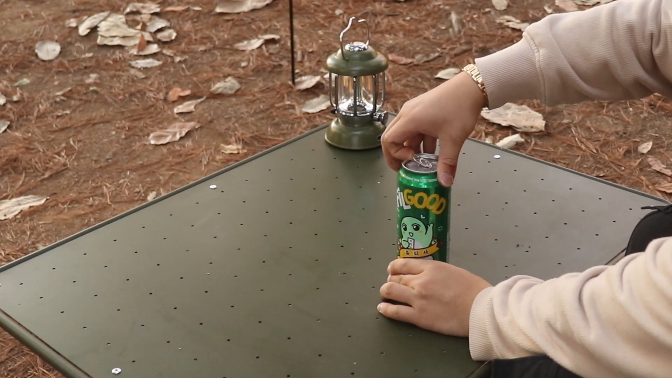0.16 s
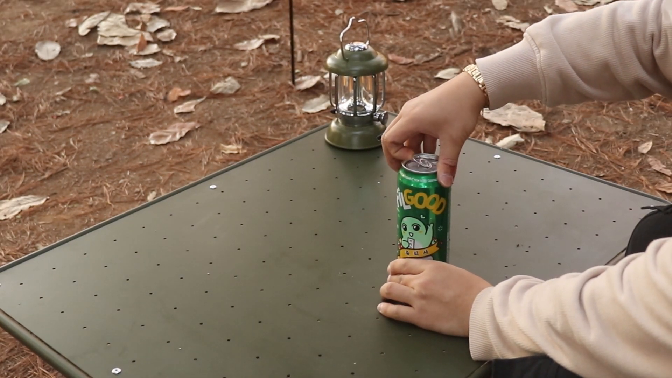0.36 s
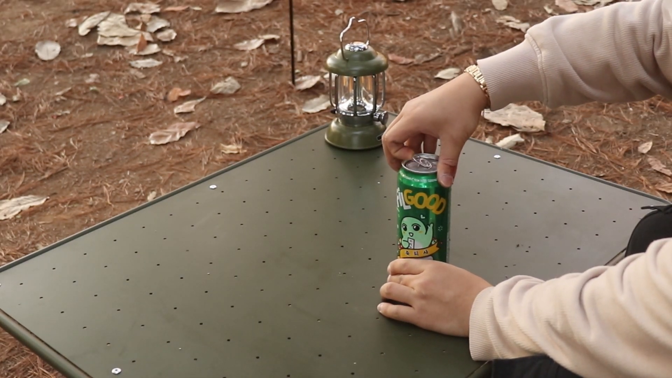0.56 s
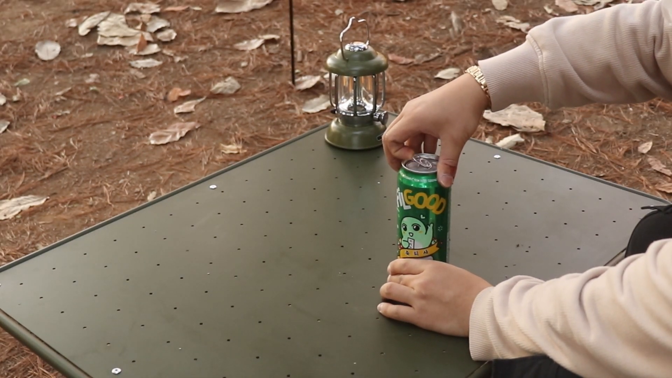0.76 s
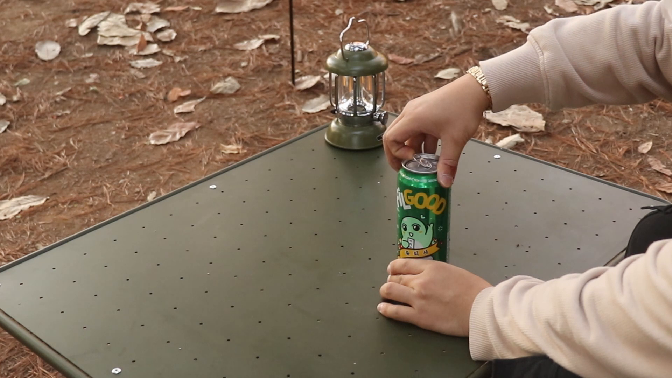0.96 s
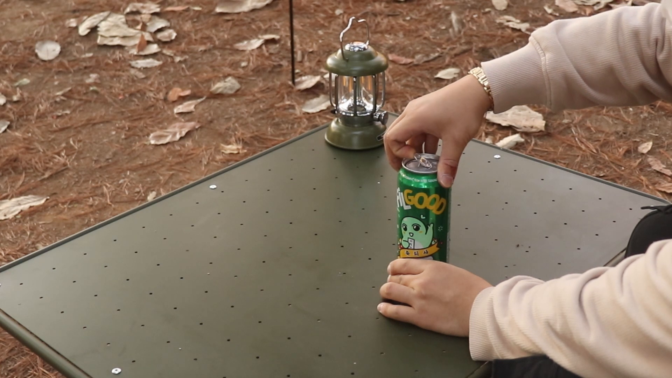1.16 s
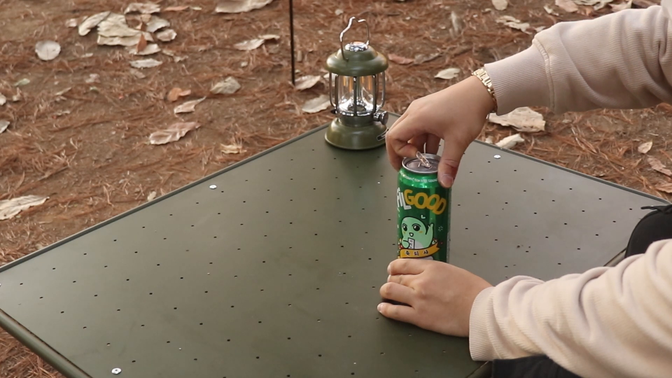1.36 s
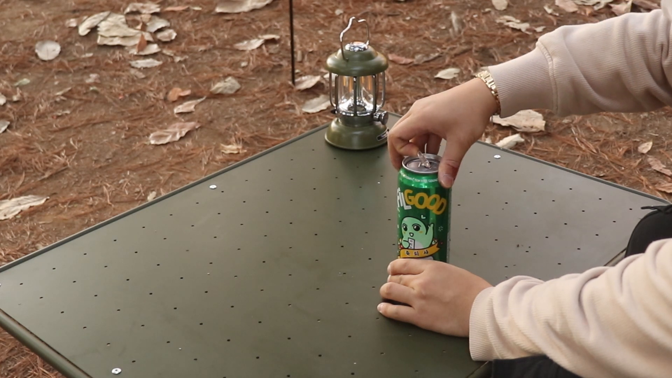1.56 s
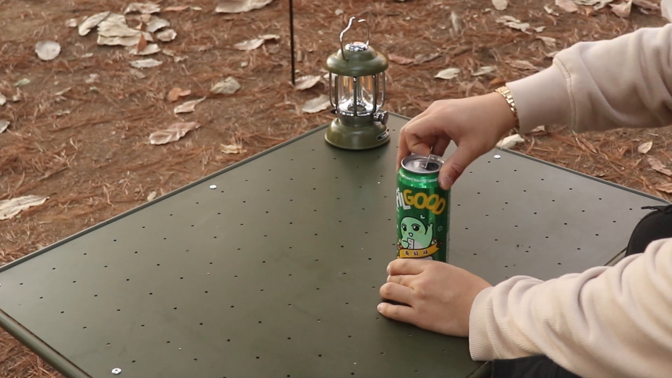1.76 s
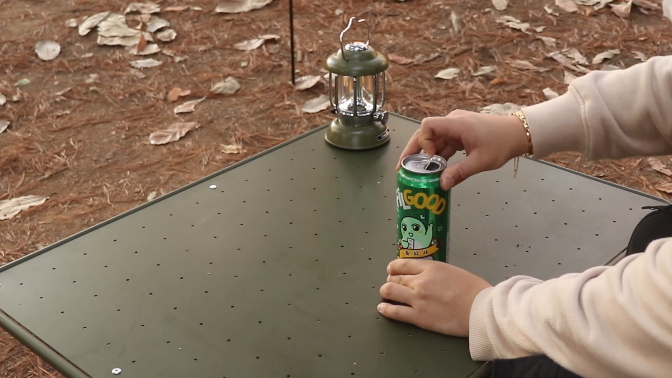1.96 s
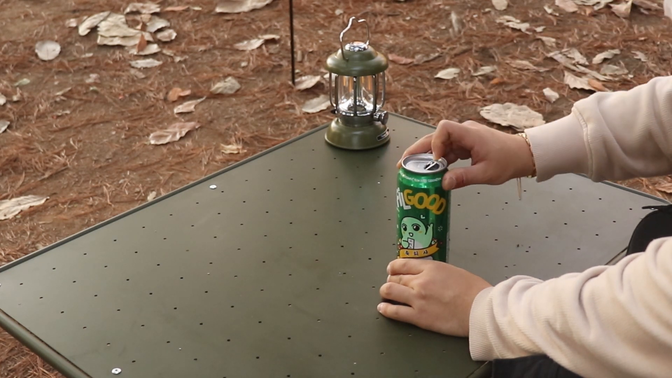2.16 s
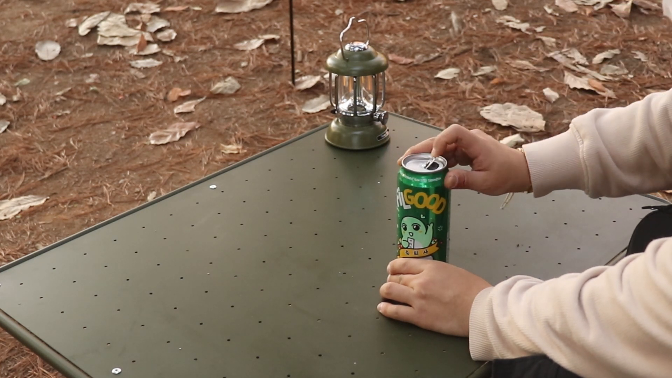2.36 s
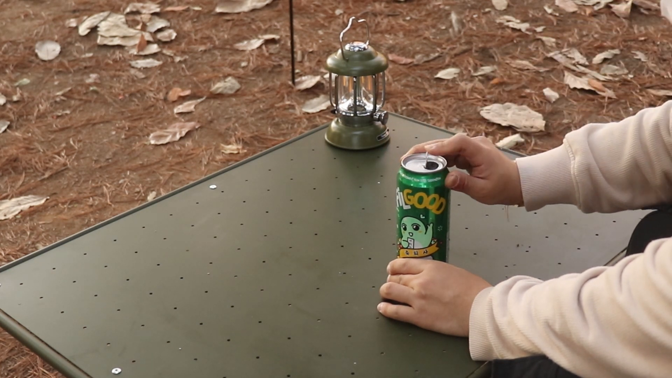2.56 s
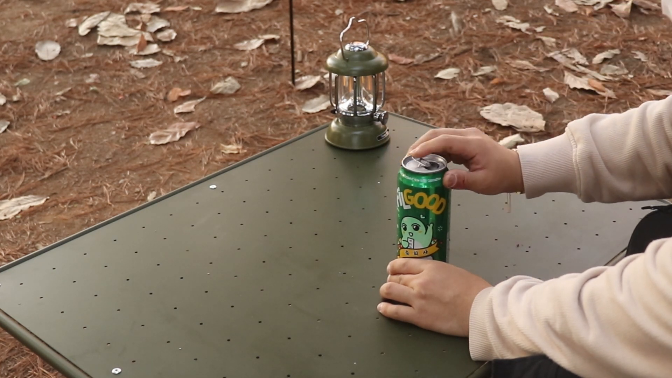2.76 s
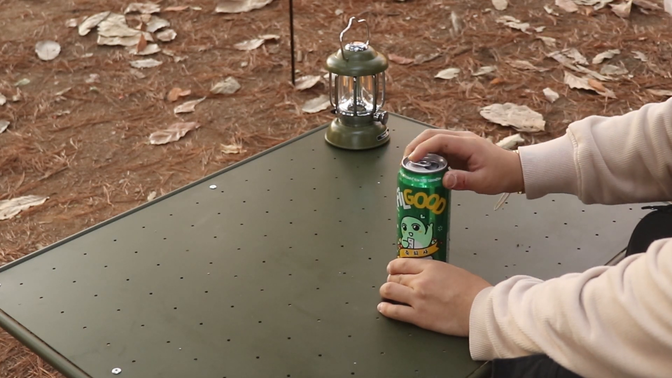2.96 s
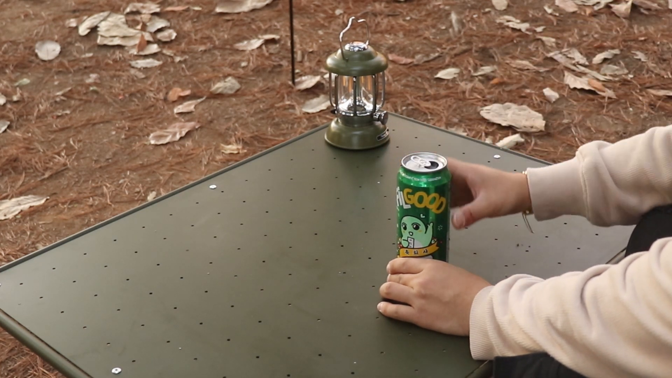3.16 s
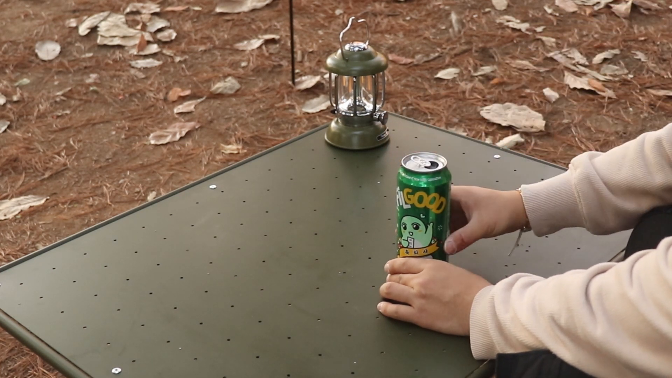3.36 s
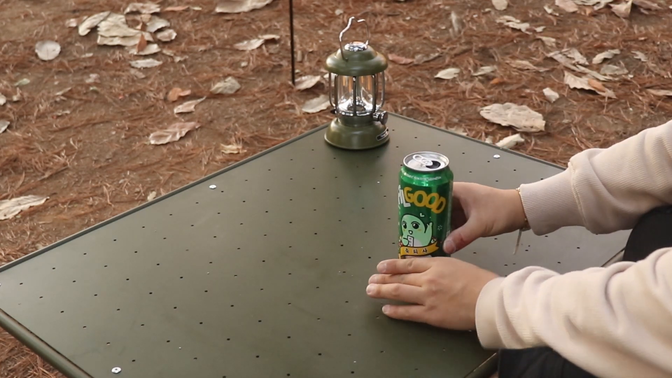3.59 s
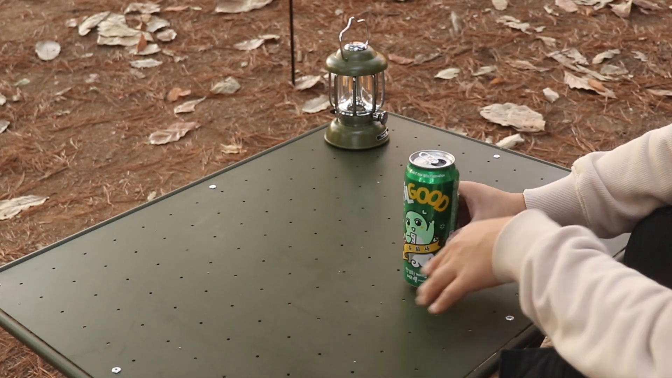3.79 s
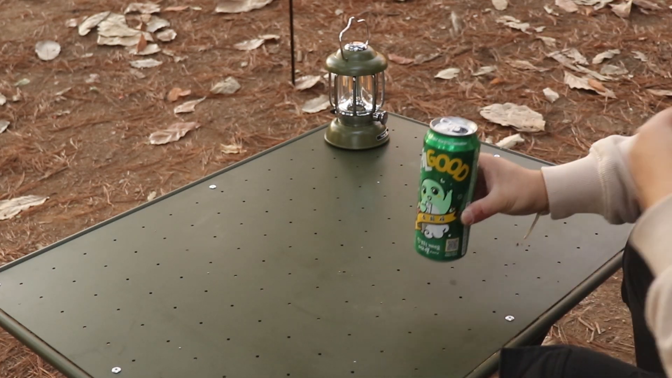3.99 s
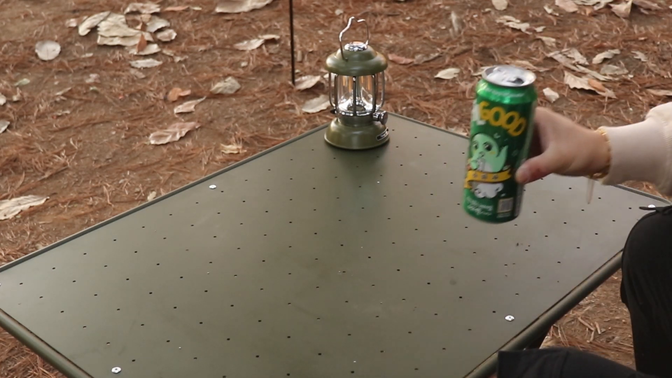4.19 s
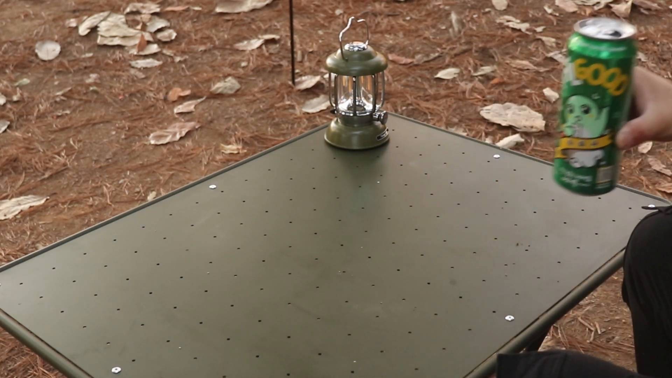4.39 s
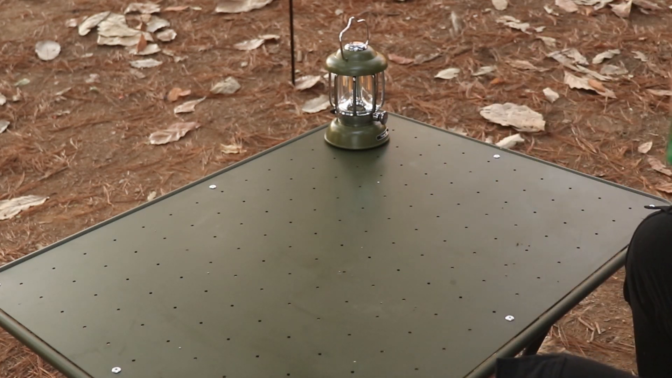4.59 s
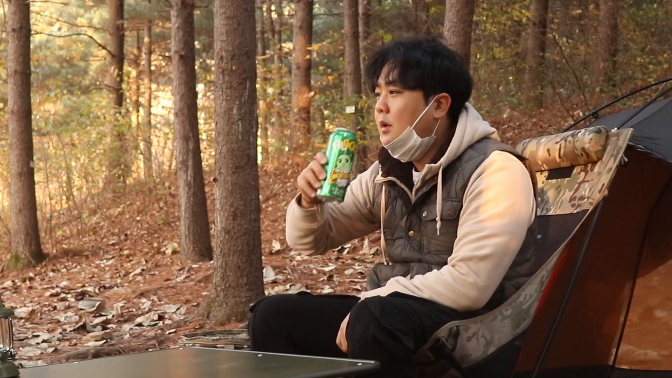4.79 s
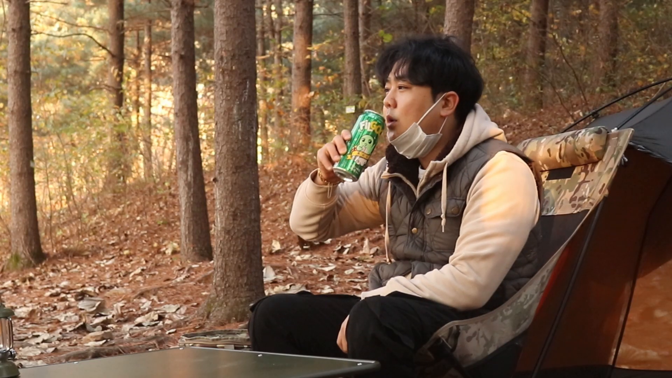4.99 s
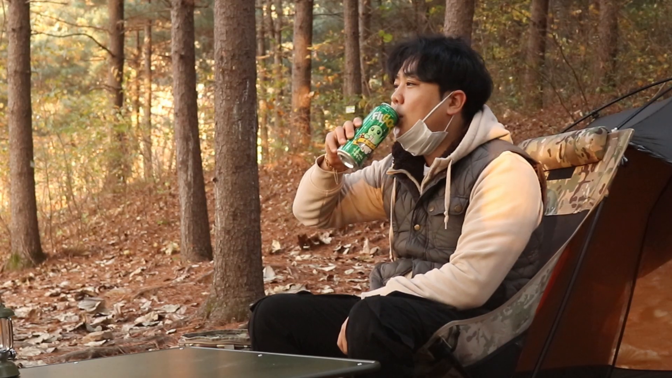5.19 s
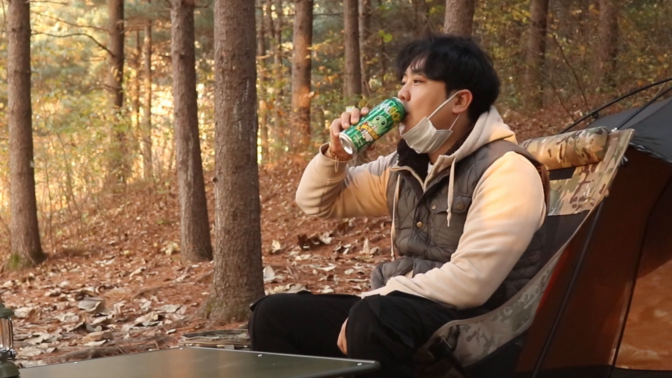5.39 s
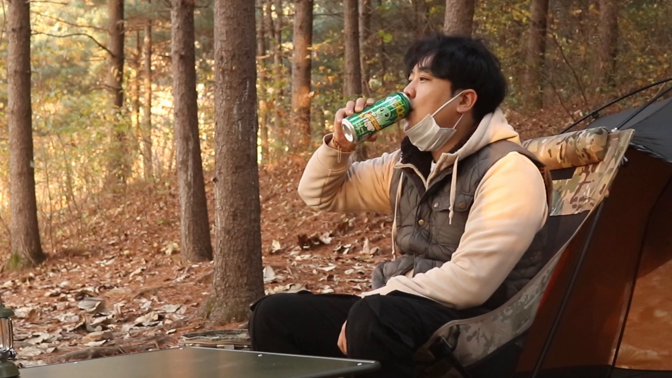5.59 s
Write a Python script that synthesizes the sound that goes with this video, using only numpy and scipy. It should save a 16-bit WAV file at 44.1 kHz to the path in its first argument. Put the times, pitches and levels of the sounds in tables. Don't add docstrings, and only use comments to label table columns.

```python
import sys
import numpy as np
from scipy import signal
from scipy.fft import rfft, irfft
from scipy.io import wavfile

SR = 44100
rng = np.random.default_rng(int(sys.argv[2]) if len(sys.argv) > 2 else 0)


def store_pcm(level_fs):
    pcm = np.round(np.clip(level_fs, -1, 1) * 32767).astype(np.int16)
    wavfile.write(sys.argv[1], SR, np.atleast_2d(pcm).T)


def volts_from_decibels(level):
    exponent = np.asarray(level, float) / 20
    return 10 ** exponent


N = 248724
VIEW_CHANGE_S = 4.664


def rms_one(x):
    return x / np.sqrt(np.mean(x ** 2) + 1e-20)


def peak_one(x):
    return x / np.max(np.abs(x))


def in_time(rows):
    s, *columns = np.transpose(rows)
    t = np.arange(N) / SR
    gate = np.clip(np.minimum(t - s[0], s[-1] - t) / 0.00044, 0, 1)
    return [np.interp(t, s, column) for column in columns] + [gate]


def at_hz(points, hz):
    table_hz, values = np.array(points)[:, 0], np.array(points)[:, 1]
    return np.interp(np.log(hz), np.log(table_hz), values)


def drift(rate):
    r = np.exp(-80 * np.pi * rate / SR)
    white = rng.standard_normal(N // 40 + 2002)
    slow = signal.lfilter([1], [1, -2 * r, r * r], white)[2000:]
    return np.interp(np.arange(N) / 40, np.arange(len(slow)), rms_one(slow))


def ring(force, hz, t60):
    r = volts_from_decibels(-60 / (t60 * SR))
    w = 2 * np.pi * hz / SR
    return signal.lfilter([0, np.sin(w)], [1, -2 * r * np.cos(w), r * r], force)


def coloured(white, spectrum):
    hz = np.maximum(np.fft.rfftfreq(len(white), 1 / SR), 1)
    inside = (hz > spectrum[0][0] / 2) & (hz < 15800)
    return rms_one(irfft(rfft(white) * volts_from_decibels(at_hz(spectrum, hz)) * inside, len(white)))


def lumpy(spectrum, patchy_db, rate):
    return coloured(rng.standard_normal(N), spectrum) * volts_from_decibels(patchy_db * drift(rate))


# start_s, level_db
GUSTS = [(0.0, -28), (0.05, -37), (0.41, -32.5), (1.08, -37.5), (1.19, -41), (1.66, -33.5), (1.78, -45),
         (1.83, -34.5), (2.18, -43), (2.22, -33.5), (2.4, -50), (2.45, -35.5), (2.53, -43.5), (2.74, -34.5),
         (2.98, -44), (3.09, -37.5), (4.35, -37), (4.66, -37)]
# pitch_hz, level_db (per Hz)
WIND_TONE = [(8.8, -26.5), (15, 6), (32, 1.5), (51, -2), (98, -8.5), (146, -18.5), (170, -26.5), (220, -44),
             (370, -120)]
# pitch_hz, level_db (per Hz)
ROAD_TONE = [(88, -38), (150, -10), (175, -4.5), (231, -7), (275, -9), (406, -6), (649, -5), (821, -6.5),
             (888, -7.5), (1260, -17), (2980, -28), (4670, -23), (16000, -48)]
# pitch_hz, level_db (per Hz)
SHELTER_TONE = [(12, -46.5), (20, -13.5), (91, -7), (134, -6.5), (168, -10), (210, -5), (328, -12.5),
                (357, -10.5), (527, -11.5), (780, -8), (1810, -31), (8180, -39.5), (14700, -41.5),
                (16000, -39.5)]


def air():
    wind_db, _ = in_time(GUSTS)
    steep = WIND_TONE + [(260, -56.5)]
    wind = volts_from_decibels(wind_db) * lumpy(steep, patchy_db=-1.5, rate=6.3)
    road = volts_from_decibels(-44.5) * lumpy(ROAD_TONE, patchy_db=-0.82, rate=3)
    shelter = volts_from_decibels(-45.5) * lumpy(SHELTER_TONE, patchy_db=.3, rate=3)
    changed = np.clip((np.arange(N) / SR - VIEW_CHANGE_S) / 0.0024, 0, 1)
    return (wind + road) * (1 - changed) + shelter * changed


# pitch_hz, level_db (per Hz)
DULL_TONE = [(900, 12.5), (1400, 8.5), (2200, 4.5), (3300, 7), (4500, 1), (7000, -5.5), (10000, -30.5)]
# pitch_hz, level_db (per Hz)
CRISP_TONE = [(3500, -24), (5500, -5.5), (8000, 10.5), (10000, 3), (14000, 5.5), (16000, -6)]
# centre_s, spread_s, dull_db, crisp_db
SLEEVE_MOVES = [(.42, 0.096, -53.5, -84), (.69, 0.053, -50, -81), (1.0, .05, -55.5, -65),
                (1.9, 0.058, -65.5, -85), (2.1, .06, -64.5, -69), (3.24, .06, -58.5, -62),
                (3.49, 0.033, -56, -72.5), (3.65, 0.061, -55, -53), (3.9, 0.11, -49.5, -58),
                (4.05, 0.073, -58.5, -64.5), (4.37, 0.066, -54.5, -61), (4.54, 0.12, -55, -62.5)]


def rustle():
    dull = lumpy(DULL_TONE, patchy_db=1.7, rate=53)
    crisp = lumpy(CRISP_TONE, patchy_db=1.6, rate=30)
    t = np.arange(N) / SR
    dull_power, crisp_power = volts_from_decibels(2 * -64), volts_from_decibels(2 * -72)
    for s, spread, dull_db, crisp_db in SLEEVE_MOVES:
        swell = np.exp(-((t - s) / spread) ** 2)
        dull_power = dull_power + volts_from_decibels(2 * dull_db + 5.5) * swell
        crisp_power = crisp_power + volts_from_decibels(2 * crisp_db) * swell
    return (t < VIEW_CHANGE_S) * (np.sqrt(dull_power) * dull + np.sqrt(crisp_power) * crisp)


# start_s, rise_s, from_hz, top_hz, level_db
BIRD_SLURS = [(.015, 0.067, 3400, 4950, -51), (0.476, 0.093, 3250, 4550, -55),
              (0.967, 0.06, 3200, 5530, -50.5), (1.21, 0.097, 3400, 4900, -56.5),
              (1.415, 0.065, 3400, 5460, -54.5), (1.975, .062, 3900, 4850, -57),
              (2.205, 0.065, 3500, 4840, -51.5), (2.545, 0.061, 3300, 4590, -47.5),
              (2.771, .066, 3650, 4900, -55), (2.96, 0.05, 3550, 4720, -48),
              (3.115, 0.034, 3750, 4500, -53.5), (3.45, 0.054, 3700, 4700, -49.5)]
# start_s, length_s, from_hz, to_hz, level_db
QUICK_CHIPS = [(2.196, .012, 3500, 5200, -57), (2.225, .017, 4700, 5350, -57),
               (2.275, .015, 4470, 4260, -51.5), (2.279, 0.016, 3750, 3670, -54),
               (2.44, .011, 3600, 5000, -55), (2.459, 0.025, 3600, 5280, -53.5),
               (2.518, .012, 5210, 3280, -53), (2.53, .018, 3300, 4950, -66),
               (3.019, 0.0202, 4580, 4000, -49), (3.508, .014, 4630, 4120, -54),
               (3.646, 0.017, 5100, 4210, -49.5), (3.66, .016, 5500, 3600, -51),
               (3.672, 0.02, 4630, 4150, -51), (3.694, .025, 4500, 4630, -55),
               (4.062, .23, 13630, 13350, -71.5), (4.322, 0.085, 13350, 13200, -78.5),
               (5.465, .03, 6500, 6450, -72.5), (5.61, .028, 5140, 5100, -73.5)]


def birds():
    notes = []
    for s, length, from_hz, to_hz, db in QUICK_CHIPS:
        middle = (s + length / 2, (from_hz + to_hz) / 2, db)
        notes.append([(s, from_hz, db - 4), middle, (s + length, to_hz, db - 4)])
    loudest_at, bend = .55, 0.049
    for s, rise, from_hz, top_hz, db in BIRD_SLURS:
        loudest_hz = from_hz + (loudest_at + bend) * (top_hz - from_hz)
        notes.append([(s, from_hz, db - 11), (s + loudest_at * rise, loudest_hz, db),
                      (s + rise, top_hz, db - 5), (s + rise + .021, .76 * top_hz, db - 10)])
    out = np.zeros(N)
    for note in notes:
        hz, level_db, gate = in_time(note)
        out += gate * volts_from_decibels(level_db + 5.5) * np.sin(2 * np.pi * np.cumsum(hz) / SR)
    return out * volts_from_decibels(3.0 * drift(90))


# pitch_hz, level_db (per Hz)
ECHO_TONE = [(300, -30), (1000, -12), (1900, -4), (2800, -4), (4200, 0), (6000, -7.5), (9000, -18),
             (15000, -19)]
# pitch_hz, t60_s
ECHO_T60 = [(500, .3), (2000, .36), (4000, .44), (7000, .34), (10000, .25), (15000, .18)]


def wood(x):
    t = np.arange(SR * 3 // 4) / SR
    edges = 250 * 2 ** np.arange(0, 6.1, .5)
    tail = 0
    for low, high in zip(edges, edges[1:]):
        half_octave = signal.butter(2, [low, high], "band", fs=SR, output="sos")
        band = signal.sosfilt(half_octave, rng.standard_normal(len(t)))
        hz = np.sqrt(low * high)
        tail = tail + band * volts_from_decibels(at_hz(ECHO_TONE, hz) - 60 * t / at_hz(ECHO_T60, hz))
    tail = tail * np.minimum(t / 0.012, 1)
    return signal.fftconvolve(x, tail / np.sqrt(np.sum(tail ** 2)))[:N]


# start_s, level_db, brightness_db
GAS_FLOW = [
    (0.143, -18.5, -5.5),
    (0.172, -15, 5),
    (0.234, -20, -2),
    (0.24, -27, -1),
    (0.262, -40, -10.5),
]
# pitch_hz, level_db (per Hz)
GAS_TONE = [(350, -24.5), (600, -19), (944, -20), (1330, -15.5), (1470, -19), (4160, -6.5), (5790, -14),
            (6460, -7.5), (8990, -5), (13000, -3.5), (16000, -3)]


def gas():
    level_db, bright_db, gate = in_time(GAS_FLOW)
    jet = lumpy(GAS_TONE, patchy_db=.8, rate=200)
    low = signal.sosfilt(signal.butter(2, 6000, fs=SR, output="sos"), jet)
    hum = rms_one(ring(jet, 6450, .010) + ring(jet, 8300, .010) + .4 * ring(jet, 4600, .004))
    return gate * volts_from_decibels(level_db) * (jet - low + volts_from_decibels(-bright_db) * (low + volts_from_decibels(-10) * hum))


# pitch_hz, t60_s
LID_RING = [(1500, .004), (2000, .005), (3300, .008), (4050, .016), (4800, .005), (6500, .006),
            (8300, .008), (11500, .008), (14400, .004)]
# start_s, crack_db, contact_ms, ring_hz (of the spot), ring_db (against the crack)
RIVET_SLIPS = [(1.2815, -37, 1.4, 4700, -2.5), (1.2851, -16.5, 1.8, 2090, -3.5), (1.2942, -8.5, 1, 4800, 7),
               (1.3162, -25.5, 4.5, 6470, 7), (1.5472, -30.5, .36, 4000, -8), (1.5636, -13, 1.4, 3820, -4),
               (1.5700, -28.5, 1.9, 2100, -4), (1.5884, -10, .5, 3370, -6), (1.6031, -7.5, .21, 3300, -6.5),
               (1.6633, -5.5, .56, 3140, -9.5), (1.7027, 1, 2.3, 7390, 6), (1.7330, -26.5, .54, 3510, 12),
               (3.5480, -51.5, .36, 6500, -3)]
TAB_SLIPS = [
    (1.3221, -12, .44, 6560, -5.5),
    (1.3268, -4.5, .56, 6575, -6),
    (1.5493, 3.5, .53, 4810, -9.5),
    (4.3830, -43.5, 1.0, 4700, -3),
]
LEVER_SLIPS = [
    (1.5518, -3, 1, 4010, 0),
    (1.7238, -9.5, .4, 2865, -8.5),
    (1.8730, -31, .5, 7660, -7.5),
]
SEAL_SLIPS = [
    (.1437, -7.5, .29, 4780, 7),
    (.2380, 1.5, 0.88, 1900, 7.5),
    (1.2941, 4, 1.4, 12430, -7),
    (1.3135, -35, 2.5, 2058, 1.5),
    (4.6780, -63.5, .6, 2870, 8),
]
SCORE_SLIPS = [
    (.2086, -17.5, .8, 2020, 14.5),
    (.2405, -19, 1.4, 3210, 12),
    (1.7026, 8.5, 2.4, 3270, 4),
    (1.7212, -18.5, 3.5, 1955, 6.5),
    (2.9438, -9.5, .04, 2800, -21.5),
    (4.3157, -46, 1.0, 2900, -2),
]
WALL_SLIPS = [
    (.2286, -26, 0.95, 1940, 11),
    (3.0880, -61, 1.3, 2650, 28),
]
# slips, pitch_hz
CAN_PARTS = [(RIVET_SLIPS, 8350), (TAB_SLIPS, 14400), (LEVER_SLIPS, 11500),
             (SEAL_SLIPS, 6600), (SCORE_SLIPS, 4400), (WALL_SLIPS, 3000)]


def snaps():
    out, far, size = np.zeros(N + SR), np.zeros(N + SR), SR // 10
    t_ms = 1000 * np.arange(size) / SR
    slips = sorted(row + (part_hz,) for rows, part_hz in CAN_PARTS for row in rows)
    noise = rng.standard_normal((len(slips), 2, size))
    thin = signal.butter(2, 1100, "high", fs=SR, output="sos")
    walls = signal.butter(1, [1000, 9000], "band", fs=SR, output="sos")
    for (s, crack_db, contact_ms, spot_hz, ring_db, part_hz), (white, loose) in zip(slips, noise):
        force = (white - 4.5 * (t_ms == 0)) * np.exp(-(t_ms / contact_ms) ** 1.3) + 1e-18
        sound = peak_one(signal.sosfilt(thin, force))
        for hz in (spot_hz, part_hz):
            sound += volts_from_decibels(ring_db) * peak_one(ring(force, hz, at_hz(LID_RING, hz)))
        shudder = signal.sosfilt(walls, loose) * np.exp(-t_ms / (3.5 * contact_ms))
        sound += volts_from_decibels(-21 + max(ring_db, 0)) * shudder
        at = round(s * SR)
        out[at:at + size] += volts_from_decibels(crack_db) * sound
        far[at] += volts_from_decibels(crack_db) * np.sqrt(np.sum(sound ** 2))
    small = signal.butter(2, 800, "high", fs=SR, output="sos")
    return signal.sosfilt(small, out[:N]), far[:N]


# start_s, pitch_hz, level_db, t60_s
CAN_AFTER_RINGS = [(.2400, 1800, -13.5, 0.054), (.2400, 1925, -22.5, 0.17), (.2420, 1817, -31, .3),
                   (.2420, 1950, -34.5, .3), (.2385, 180, -24.5, 0.08), (.2420, 2070, -32.5, 0.15),
                   (1.7040, 604, -17, 0.036), (1.707, 212.3, -27.5, 0.25), (1.704, 961, -9, 0.04),
                   (1.7050, 1646, -29, .08), (1.703, 2103, -22.5, 0.089), (1.7050, 3123, -22.5, 0.18),
                   (1.707, 3950, -24, 0.43)]


def after_rings():
    out, t = np.zeros(N), np.arange(SR // 2) / SR
    rattle_share, rattle_cycles = .88, 30
    noise = rng.standard_normal((len(CAN_AFTER_RINGS), SR // 2))
    for (s, hz, level_db, t60), white in zip(CAN_AFTER_RINGS, noise):
        rattle = rms_one(ring(white, hz, rattle_cycles / hz))
        rattle = rattle * volts_from_decibels(-60 * t / t60) * np.minimum(t / 0.0012, 1)
        clean = ring(1e-18 + (t == 0), hz, t60)
        at = round(s * SR)
        out[at:at + SR // 2] += volts_from_decibels(level_db) * ((1 - rattle_share) * clean + rattle_share * rattle)
    return out


# pitch_hz, width_hz
TABLE_GAPS = [(5900, 500.), (8900, 420)]


def table_top(x):
    for hz, width in TABLE_GAPS:
        x = signal.lfilter(*signal.iirnotch(hz, hz / width, fs=SR), x)
    return x


def scuff():
    start_s, level_db, t60_s = 3.507, -46, 0.33
    since = np.arange(N) / SR - start_s
    band = signal.butter(4, [4500, 7400], "band", fs=SR, output="sos")
    grain = rms_one(signal.sosfilt(band, rng.standard_normal(N))) * volts_from_decibels(3.3 * drift(83))
    return np.clip(since / 0.0036, 0, 1) * volts_from_decibels(level_db - 60 * np.maximum(since, 0) / t60_s) * grain


# start_s, pitch_hz, level_db
HOARSE_CALL = [
    (4.664, 1960, -61.5),
    (4.71, 1944, -58.5),
    (4.79, 1834, -58),
    (4.806, 1660, -61),
    (4.816, 1165, -69),
]
# multiple (of the pitch), level_db
HOARSE_OVERTONES = [(2, 0), (3, -12)]


def squawk():
    hz, level_db, gate = in_time(HOARSE_CALL)
    throb_hz, throb_db, throb_pitch = 52, 5.5, .022
    throb = np.sin(2 * np.pi * throb_hz * np.cumsum(1 + .15 * drift(20)) / SR)
    phase = 2 * np.pi * np.cumsum(hz * (1 + throb_pitch * throb + .008 * drift(160))) / SR
    voice = sum(volts_from_decibels(db) * np.sin(k * phase) for k, db in HOARSE_OVERTONES)
    return gate * volts_from_decibels(level_db + 2.5 + throb_db * throb + 2.0 * drift(55)) * voice


def scene():
    cracks, far_cracks = snaps()
    jet = gas()
    calls = birds() + squawk()
    can = table_top(cracks + after_rings() + jet)
    echoes = wood(volts_from_decibels(-23.5) * far_cracks + volts_from_decibels(-24.5) * jet + volts_from_decibels(-12) * calls)
    return (can + calls + echoes + rustle() + air() + scuff())[None]


def roll_off(x):
    return signal.sosfilt(signal.butter(12, 16370, fs=SR, output="sos"), x)


def record(dry):
    clipped = np.clip(dry, -.99, .99)
    top_cut = signal.cheby2(10, 40, 16800, fs=SR, output="sos")
    return roll_off(signal.sosfilt(top_cut, clipped))


dry = scene()
out = record(dry)
store_pcm(out)
```